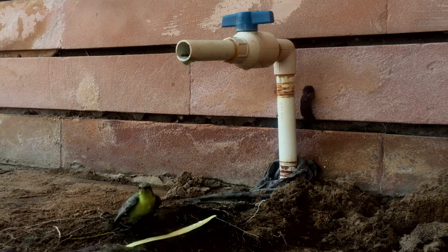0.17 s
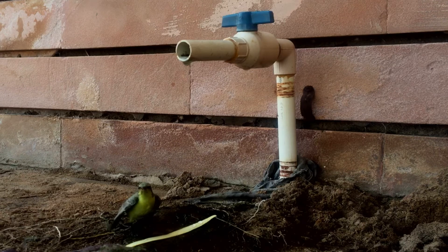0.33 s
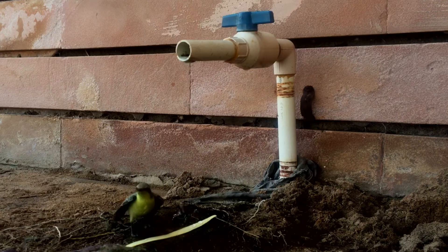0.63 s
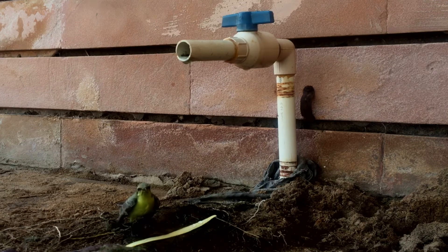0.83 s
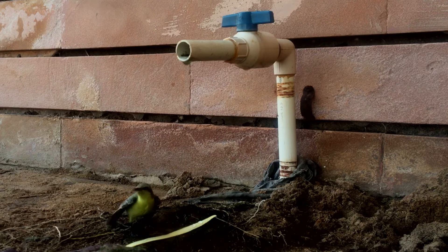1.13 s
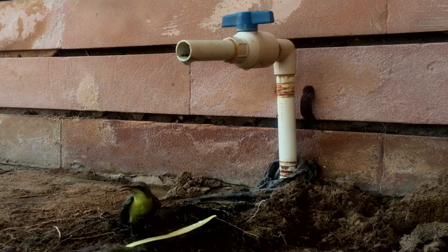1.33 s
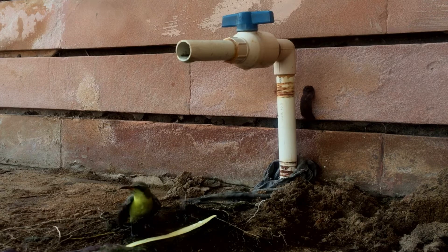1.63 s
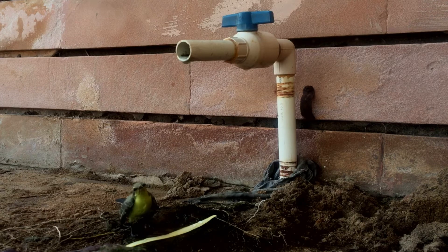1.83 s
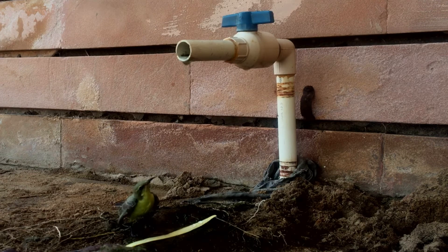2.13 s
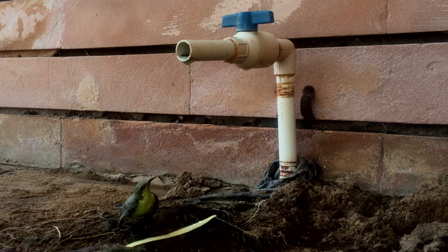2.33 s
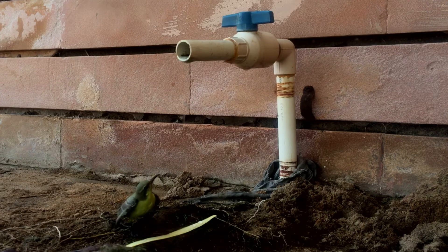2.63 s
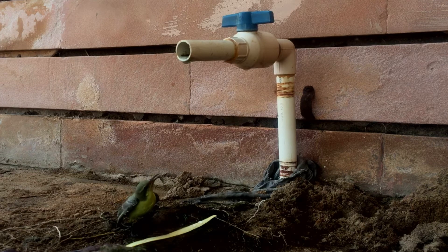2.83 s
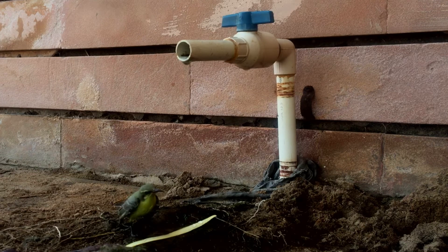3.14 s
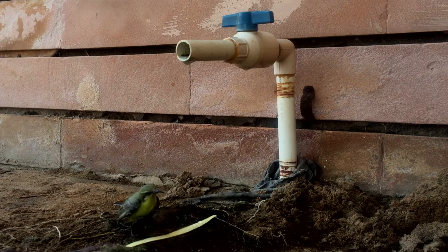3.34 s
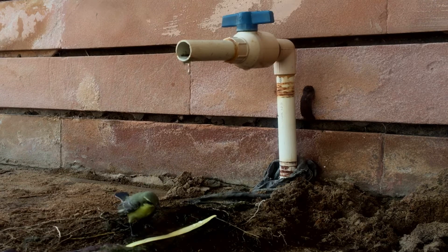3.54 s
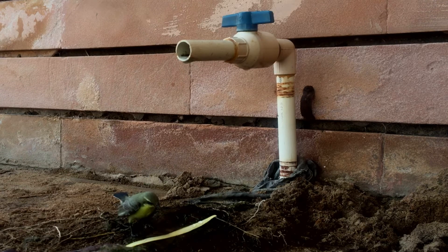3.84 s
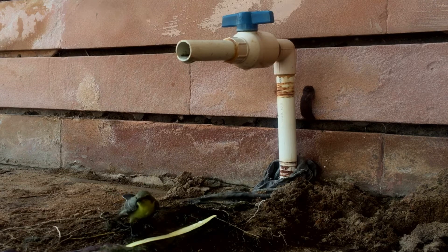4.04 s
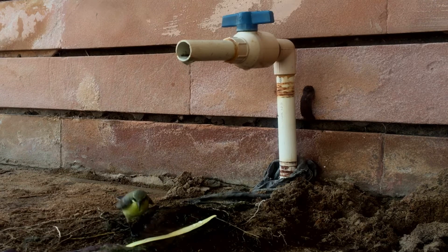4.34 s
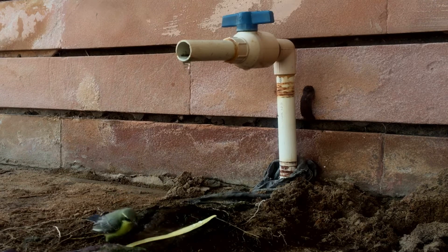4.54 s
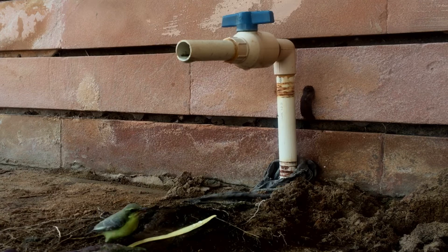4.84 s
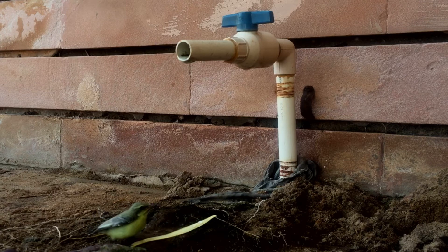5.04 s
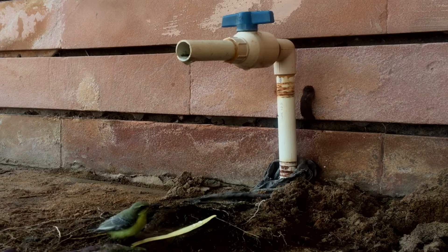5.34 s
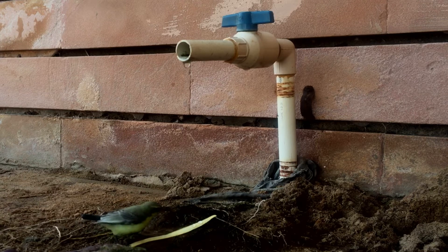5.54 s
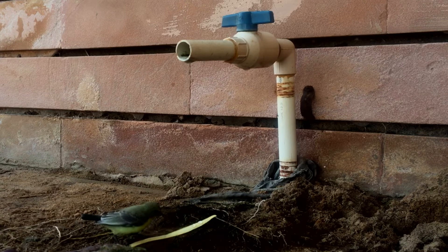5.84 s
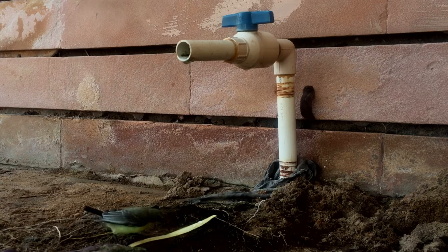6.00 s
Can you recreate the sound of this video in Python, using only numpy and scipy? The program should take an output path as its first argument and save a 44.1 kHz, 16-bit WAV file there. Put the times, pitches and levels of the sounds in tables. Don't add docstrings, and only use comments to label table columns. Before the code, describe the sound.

Outdoors in a small yard, a soft low rumble of distant traffic runs throughout, swelling gently and most broadly around 4.7 s, with faint engine hums drifting in and out. At the very start the tail of a loud, high bird whistle ends by 0.1 s. A faint stuttering chip comes at 1.1 s, then at 1.4 s a piercing quarter-second whistle, opened by a tiny rasp, scooping up and sagging with a fast warble. A similar whistle, the loudest, sounds at 2.9 s. At 3.5 s a quieter, hoarse squeak climbs quickly into a thin clean tone and dies by 3.8 s. A barely audible high insect buzz throbs from 4.1 to 4.9 s and briefly at 5.25 s. Small dry soil ticks fall near 4.75 s, before a softer-starting, fluttering whistle at 4.9 s. A faint last chip comes at 6.1 s. Close wall reflections give each call a short tail.

```python
import sys
import numpy as np
from scipy import signal
from scipy.fft import rfft, irfft
from scipy.io import wavfile
from scipy.ndimage import uniform_filter1d

SR = 44100
rng = np.random.default_rng(int(sys.argv[2]) if len(sys.argv) > 2 else 0)


def put_to_file(sound):
    columns = np.atleast_2d(sound).T
    safe = np.clip(columns, -1, 1)
    whole_steps = np.round(safe * 32767)
    wavfile.write(sys.argv[1], SR, whole_steps.astype(np.int16))


def makeup_ratio(level_db):
    decades = np.asarray(level_db, float) / 20
    return 10 ** decades


N = 272086
WARBLE_HZ = 130.8


def evened(x):
    return x / np.sqrt(np.mean(x ** 2) + 1e-20)


def read(points, hz):
    f, value = np.transpose(points)
    return np.interp(np.log(hz + 1), np.log(f + 1), value)


def add(mix, s, sound):
    sound = sound[max(-round(s * SR), 0):]
    part = mix[max(round(s * SR), 0):][:len(sound)]
    part += sound[:len(part)]


def unroll(rows):
    s, *columns = np.transpose(rows)
    t = np.arange(s[0], s[-1], 1 / SR)
    return t, *(np.interp(t, s, c) for c in columns)


def wander(size, hz):
    noise = rng.standard_normal(size + 2000)
    return evened(signal.lfilter(*signal.butter(2, hz, fs=SR), noise)[2000:])


def bump(t, s, width):
    return np.exp(-((t - s) / width) ** 2)


def traffic():
    # (frequency [Hz], level [dB per Hz])
    rumble = [(13, -50.5), (22, -19.5), (30, -15.5), (52, -3.5), (78, -2.5), (106, -8.5), (125, -11.5),
              (292, -21), (479, -31), (566, -33.5), (765, -39.5), (1610, -44), (4970, -55), (9890, -59),
              (15800, -63.5)]
    # (centre [Hz], half width [Hz], gain [dB])
    port_bands = [(4860, 180, -3.5), (6143, 900, 0.5), (10240, 350, -1.5), (12390, 1200, 2.5)]
    # (nearest [s], half width [s], swell [dB])
    passes = [
        (.85, .5, 2),
        (2.35, .35, 3),
        (3.35, .2, 1),
        (4.7, 1, 4),
        (6.099, 0.35, 2.5),
    ]
    frames, hz = N // 1024 + 5, np.fft.rfftfreq(4096, 1 / SR)
    a, b, patches = rng.standard_normal((frames, len(hz), 3)).T
    patches = evened(uniform_filter1d(uniform_filter1d(patches, 30, 0), 5, 1))
    t = np.arange(frames) * 1024 / SR
    swell_db = sum(db * bump(t, s, width) for s, width, db in passes)
    swell_db = swell_db - swell_db.mean()
    share = 1 / (1 + (hz / 3000) ** 2)
    port_db = sum(db * bump(hz, mid, width) for mid, width, db in port_bands)
    steady_db = (read(rumble, hz) + port_db)[:, None]
    moving_db = share[:, None] * (swell_db + 1.1 * patches)
    z = (a + 1j * b) * makeup_ratio(steady_db + moving_db)
    return makeup_ratio(-45.5) * evened(signal.istft(z, nperseg=4096, noverlap=3072)[1][:N])


def hum(s, end, from_hz, to_hz, db):
    hz = np.linspace(from_hz, to_hz, round((end - s) * SR))
    tone = np.sin(2 * np.pi * np.cumsum(hz + .6 * wander(len(hz), 2.7)) / SR)
    level = np.sqrt(2) * makeup_ratio(db + 1.0 * wander(len(hz), 4.9))
    return s, level * tone * signal.windows.tukey(len(hz), .7)


def echoes(start, t60):
    t = np.arange(SR // 2) / SR
    tail = rng.standard_normal(len(t)) * (rng.random(len(t)) < .1) * (t > start) * makeup_ratio(-60 * t / t60)
    return tail / np.linalg.norm(tail)


def in_yard(x, wall_db, yard_db):
    yard = signal.lfilter(*signal.butter(2, 5600, fs=SR), echoes(0.01216, 0.27))
    reply = makeup_ratio(wall_db) * echoes(.002, 0.042) + makeup_ratio(yard_db + 2.5) * yard
    return np.pad(x, (0, len(reply) - 1)) + signal.fftconvolve(x, reply)


def arch(row, gain_db, power):
    # (frequency [Hz], gain [dB])
    beak_tone = [(5150, -24.5), (5330, -12), (5650, -4.5), (5900, -1.5), (6300, -0.2), (6700, 1.5)]
    # (frequency [Hz], gain [dB])
    beak_octave = [(10300, -10), (10650, -8), (11300, -22.5), (11800, -14.5), (12400, -3), (13300, 0.5)]
    s, length, db, push_db, octave_db = row
    u = np.linspace(0, 1, 40)
    since = u * length
    hz = 6665 - 660 * np.exp(-since / .019) - 1510 * u ** power
    effort_db = gain_db * u
    db = db + effort_db + push_db * np.exp(-since / 0.027) + read(beak_tone, hz)
    late_db = -2.7 * max(push_db, 0) * np.exp(-since / .015)
    octave_db = octave_db + effort_db + late_db + read(beak_octave, 2 * hz)
    return list(zip(s + since, hz, db, octave_db)), WARBLE_HZ, -31


def whistle(shape, row, release, manner):
    # (time [s], shift [Hz], half width [s])
    slips = [(.030, 481.5, 0.0043), (.023, -120, 0.0037), (1.147, -300, 0.0067), (1.173, -300, .004),
             (1.389, -600, 0.0024), (1.404, -480, 0.0037), (1.416, 230, 0.0017), (2.889, -500, 0.0028),
             (2.911, 195.5, .004), (4.910, -400, 0.0039), (4.922, -400, .005), (4.934, 90, 0.0055),
             (6.104, -300, 0.0036), (6.111, 595.5, .003)]
    # (time [s], change [dB], half width [s])
    dips = [(.0285, -12, 0.0017), (0.069, -6, 0.007), (1.415, 0, 0.001), (1.48, -3, 0.026),
            (1.616, -9, 0.0013), (2.93, 0, .03), (3.03, -2, 0.018), (3.1, -1.5, .01),
            (4.934, -19, 0.000806), (4.987, -15.5, 0.0023), (4.996, -21, 0.0015), (5.010, -18, 0.0029),
            (5.030, -18.5, .0031), (5.065, 3.5, 0.014), (5.125, -18, 0.00422), (5.134, -3.5, 0.0038),
            (6.113, -8, 0.0017)]
    depth_hz, throb_db, fade, *bend = manner
    rows, warble_hz, yard_db = shape(row, *bend)
    close_s, end_hz, end_db, end_octave_db, third_db = release
    last_s, last_hz = rows[-1][:2]
    t, hz, db, octave_db = unroll(rows + [(last_s + close_s, end_hz, end_db, end_octave_db)])
    closing = np.clip((t - last_s) / close_s, 0, 1)
    drop_hz = last_hz - end_hz
    hz = uniform_filter1d(hz + drop_hz * closing, size=300, mode="nearest")
    hz = hz - drop_hz * closing ** 1.6
    db = db - 34 * closing * (1 - closing)

    cycle = 2 * np.pi * np.cumsum(warble_hz * (1 + .3 * wander(len(t), 44))) / SR
    calm = np.exp((t[0] - t) / fade)
    warble = .7 * np.sin(cycle) + .3 * wander(len(t), 170)
    hz = hz + depth_hz * calm * warble + 24 * wander(len(t), 45)
    hz = hz + sum(shift * bump(t, s, width) for s, shift, width in slips)
    db = db + throb_db * (calm * np.sin(cycle - .8) + .28 * wander(len(t), 120))
    db = db + sum(dip_db * bump(t, s, width) for s, dip_db, width in dips)
    octave_db = octave_db + 2.3 * wander(len(t), 90)
    third_db = third_db - .045 * np.maximum(5250 - hz, 0) + 4

    turn = 2 * np.pi * np.cumsum(hz) / SR
    overtones = np.sin(2 * turn) + makeup_ratio(third_db) * np.sin(3 * turn)
    tone = makeup_ratio(db) * np.sin(turn) + makeup_ratio(octave_db) * overtones
    fades = np.clip(np.minimum(t[-1] - t, t - t[0]) / .003, 0, 1)
    return t[0], in_yard(np.sqrt(2) * tone * fades, -16.5, yard_db)


def tick(db):
    return makeup_ratio(db) * np.diff(rng.standard_normal(202), 2) * np.exp(-np.arange(200) / 40) / 3


def rasp(row, throat, to_hz, rough, after_db, throb_db, jitter=0.057):
    s, length, db, swell_db, rising_db = row
    u = np.arange(0, length + 0.12, 1 / SR) / length
    hz = (2300 + (to_hz - 2300) * np.minimum(u, 1) ** 3) * (1 + jitter * wander(len(u), 400))
    turn = 2 * np.pi * np.cumsum(hz) / SR
    folds = sum(np.cos(k * turn) * (k * hz < 20000) for k in range(1, 8))
    drive = (1 - rough) * evened(folds) + rough * rng.standard_normal(len(u))
    throb = np.sin(2 * np.pi * WARBLE_HZ * u * length)
    drive = drive * makeup_ratio(1.1 * wander(len(u), 160) + throb_db * throb)

    bins = np.fft.rfftfreq(len(u), 1 / SR)
    throat_db = read(throat, bins) - 0.058 * np.maximum(1750 - bins, 0)
    voiced = evened(irfft(rfft(drive) * makeup_ratio(throat_db), len(u)))
    rising = np.sin(turn) + .5 * np.sin(2 * turn)
    voiced = voiced + makeup_ratio(rising_db) * rising * np.clip(9 * (1.1 - u), 0, 1) * (0.054 + u)

    swell_db = -swell_db * (1 - u / 0.91) ** 2
    leak_db = after_db - 600 * (u - 1) * length
    shut = np.clip((u - 1) * 8, 0, 1)
    envelope = (1 - shut) * makeup_ratio(swell_db) + shut * makeup_ratio(leak_db)
    return s, in_yard(makeup_ratio(db) * envelope * voiced * np.clip(u * 25, 0, 1), -11.5, -40.0)


def chip(row, *_):
    s, length, hz, db, octave_db = row
    rise_db, fall_db = -4.5, -10
    start = (s, hz - 180, db + rise_db, octave_db + 4 * rise_db)
    crest = (s + 0.48 * length, hz, db, octave_db)
    end = (s + length, hz, db + fall_db, octave_db + fall_db)
    return [start, crest, end], 310, -15


def peep(db, hz, length):
    t = np.arange(0, length, 1 / SR)
    level = makeup_ratio(db + 1.5 * wander(len(t), 150))
    turn = 2 * np.pi * np.cumsum(hz + 90 * wander(len(t), 200)) / SR
    return level * np.sin(turn) * np.hanning(len(t))


def whine():
    # (time [s], pitch [Hz], effort [dB])
    climb = [
        (3.52, 1490, -47),
        (3.54, 1750, -38),
        (3.578, 2115, -40),
        (3.608, 2550, -42.5),
        (3.62, 2900, -42.5),
        (3.653, 3290, -41.5),
        (3.682, 4554, -40),
        (3.735, 4930, -47.5),
        (3.79, 5000, -56.5),
    ]
    # (frequency [Hz], gain [dB])
    whine_throat = [(1500, -27), (2300, -12), (3100, -20), (4300, 4.5), (4850, 2), (5350, 2), (6500, -12),
                    (8000, -26), (9300, -12), (10500, -29), (12500, -19), (15500, -13.5)]
    # (time [s], jump [dB])
    surges = [
        (3.537, 8.5),
        (3.578, 2),
        (3.609, 5.5),
        (3.672, -1),
    ]
    t, hz, db = unroll(climb)
    end_sag = 0.04 * np.exp((t - t[-1]) / 0.0055)
    hz = hz * (1 + 0.0043 * wander(len(t), 160) - end_sag)
    turn = 2 * np.pi * np.cumsum(hz) / SR
    surge_db = 0
    for s, jump_db in surges:
        surge_db = surge_db + jump_db * np.exp(-np.maximum(t - s, 0) / .016) * np.clip((t - s) / .002, 0, 1)
    slope_db = -3.1 + .24 * surge_db
    stack = 0
    for k in range(1, 12):
        broken_db = min(.5 * k ** 1.5, 5.5) * wander(len(t), 60)
        strand_db = slope_db * max(k - 2, -1) + read(whine_throat, k * hz) + broken_db
        stack = stack + makeup_ratio(strand_db) * np.sin(k * turn) * (k * hz < 20000)
    breath_gain = makeup_ratio(1.8 * read(whine_throat, np.fft.rfftfreq(len(t), 1 / SR)))
    breath = irfft(rfft(rng.standard_normal(len(t))) * breath_gain, len(t))
    hoarse = np.clip((4500 - hz) / 900, 0, 1)
    stack = stack * (1 + .1 * hoarse * wander(len(t), 700))
    breath_db = -23 - 25 * (1 - hoarse)
    tremor_db = 2.2 * (1 - hoarse) * np.sin(2 * np.pi * 70 * (t - 3.69))
    voice = makeup_ratio(db + surge_db + tremor_db - 1.5) * (stack + makeup_ratio(breath_db) * evened(breath))
    fades = np.clip(np.minimum((t - t[0]) / 0.041, (t[-1] - t) / 0.0062), 0, 1)
    return t[0], in_yard(voice * fades, -8, -16.5)


def insect(s, length, db, swell_db):
    throb_s = .0555
    t = np.arange(-throb_s / 2, length, 1 / SR)
    place = (t / throb_s + .5) % 1 - .5
    hz = 10150 - 50 * np.sin(2 * np.pi * place) + 90 * wander(len(t), 250)
    tone = np.sin(2 * np.pi * np.cumsum(hz) / SR)
    db = db + swell_db * bump(t / length, .42, .12) + 2.6 * wander(len(t), 25)
    throbs = .3 + bump(place, 0, .22)
    return s + t[0], np.sqrt(2) * makeup_ratio(db) * throbs * tone * signal.windows.tukey(len(t), .05)


def scene():
    mix = traffic()

    # (start [s], end [s], first pitch [Hz], last pitch [Hz])
    hums = [(-1.2, 3.5, 66.5, 77), (1.85, 2.75, 66.5, 66), (2.75, 3.2, 77, 78), (2.45, 4.15, 148, 181),
            (2.25, 2.75, 204, 224), (2.9, 5.2, 47.5, 53), (4.05, 4.5, 60.5, 62), (3.95, 4.55, 92, 99),
            (4.95, 5.35, 104, 106), (.25, .7, 93, 97), (.7, 1.15, 98, 96), (5.45, 5.9, 85, 84)]
    hum_peaks = [-46, -44, -50, -53, -59, -47, -47, -45, -47, -45.5, -51, -51]
    for row, db in zip(hums, hum_peaks):
        add(mix, *hum(*row, db))

    # (start [s], length [s], level [dB], push at the start [dB], octave level [dB])
    whistles = [
        (-.083, .18, -21.5, 1, -47),
        (1.389, 0.25, -22.5, 6, -49),
        (2.889, 0.25, -19.5, -0.5, -45.5),
        (4.906, 0.24, -25, -5, -43.5),
    ]
    # (start [s], length [s], pitch [Hz], level [dB], octave level [dB])
    chips = [
        (1.138, 0.036, 5800, -45, -64.5),
        (6.094, 0.03, 5710, -45, -66.5),
    ]
    # (length [s], end pitch [Hz], end level [dB], end octave [dB], third partial re second [dB])
    releases = [
        (.01, 4240, -51, -46.5, -5),
        (0.0114, 3880, -43.5, -41.5, -6),
        (0.0102, 4050, -40, -35, 3),
        (.013, 3950, -34.5, -41.5, -6.5),
        (.004, 5400, -60, -78.5, -22.5),
        (.004, 5600, -55, -75, -22),
    ]
    # (warble depth [Hz], throb [dB], fade of both [s], effort gained [dB], power of the sag [1])
    manners = [
        (50.16, -2.5, 0.25, 1, 2.5),
        (151.2, 2, 0.12, 1.5, 3),
        (101.8, 1.3, .12, -5.5, 2.5),
        (120, 3.5, .13, 1, 3),
        (196.6, 9, 0.13, 0, 0),
        (220, 9.5, .1, 0, 0),
    ]
    shapes = [arch] * len(whistles) + [chip] * len(chips)
    for note in zip(shapes, whistles + chips, releases, manners):
        add(mix, *whistle(*note))

    # (time [s], peak [dB])
    ticks = [
        (0.7156, -68.5),
        (4.7336, -54),
        (4.753, -49),
        (5.8594, -65.5),
    ]
    for s, db in ticks:
        add(mix, s, tick(db))

    # (start [s], length [s], level [dB], swell [dB], rising tone re rasp [dB])
    soft_rasps = [
        (1.11, 0.032, -46.5, 7.2, -34),
        (6.061, .034, -49.5, 5.7, -36),
    ]
    # (frequency [Hz], gain [dB])
    throat_soft = [(820, -55), (1400, -19), (2280, -23), (3250, -20), (4140, -2.5), (4920, -18.5),
                   (5390, -1), (6150, -12), (6950, -1.5), (8010, -20.5), (9130, -9.5), (10200, -34),
                   (11200, -25), (15800, -36.5)]
    for row in soft_rasps:
        add(mix, *rasp(row, throat_soft, to_hz=2250, rough=0.63, after_db=-10, throb_db=1.4))

    # (start [s], length [s], level [dB], swell [dB], rising tone re rasp [dB])
    loud_rasps = [
        (1.36, 0.027, -30.5, 26, -23),
        (2.86, .030, -30.5, 19.5, -16.5),
        (4.881, 0.029, -34, 12.5, -7.5),
    ]
    # (frequency [Hz], gain [dB])
    throat_loud = [(940, -65), (1600, -33.5), (1920, -22), (2560, -24), (3680, -30.5), (4250, -8.5),
                   (5050, -21), (5780, 0.5), (8000, -6), (8640, -1), (9500, -12), (10200, -19.5),
                   (11000, -15), (11700, -26.5), (15800, -24.5)]
    for row in loud_rasps:
        add(mix, *rasp(row, throat_loud, to_hz=5130, rough=.65, after_db=-25.5, throb_db=0.0))

    # (start [s], peak [dB], pitch [Hz], length [s])
    peeps = [
        (3.815, -70, 10700, .03),
        (3.3, -76, 3350, .18),
        (3.31, -79, 3600, .15),
        (2.31, -72, 2000, .06),
    ]
    for s, *call in peeps:
        add(mix, s, peep(*call))

    # (start [s], length [s], level [dB], swell [dB], rising tone re rasp [dB])
    whine_rasp = [
        (3.498, .032, -48, 3, -25),
    ]
    # (frequency [Hz], gain [dB])
    throat_whine_rasp = [(820, -53), (1400, -18), (2190, -18.5), (3210, -15), (4310, -3), (4920, -17.5),
                         (5390, 0), (7380, -8.5), (10300, -30.5), (11100, -23.5), (15800, -23.5)]
    add(mix, *rasp(whine_rasp[0], throat_whine_rasp, to_hz=1600, rough=0.6, after_db=-25, throb_db=1.0))
    add(mix, *whine())

    # (first throb [s], length [s], level [dB], mid swell [dB])
    bouts = [
        (4.112, 0.75, -84.5, 9),
        (5.25, .26, -89.5, -2.5),
    ]
    for row in bouts:
        add(mix, *insect(*row))
    return mix[None]


def band_limit(x):
    return signal.sosfilt(signal.butter(12, 15940, fs=SR, output="sos"), x)


def record(dry):
    cut = signal.sosfilt(signal.butter(2, 38, "highpass", fs=SR, output="sos"), dry)
    hz, _, z = signal.stft(cut, SR, nperseg=1024, boundary="odd")
    power = uniform_filter1d(uniform_filter1d(abs(z) ** 2, size=12, axis=1), size=3, axis=2)
    loudest = power[:, hz > 3000].max(1, keepdims=True)
    margin_db = 10 * np.log10(power / loudest + 1e-20) + 58
    masked = makeup_ratio(np.clip(4 * margin_db, -25, 0))
    gain = np.where(hz[:, None] > 4400, masked, 1) * (hz[:, None] < 15850)
    return band_limit(signal.istft(z * gain, SR, nperseg=1024)[1][:, :N])


dry = scene()
out = record(dry)
put_to_file(out)
```